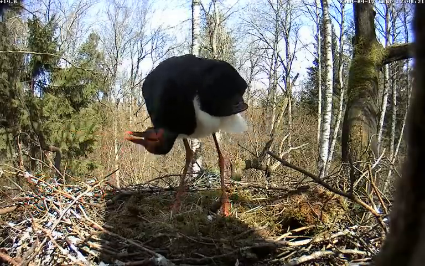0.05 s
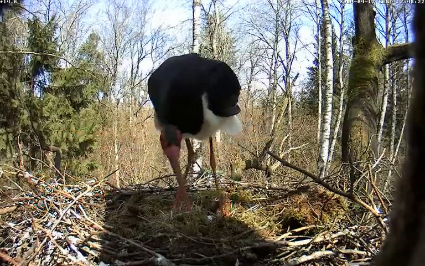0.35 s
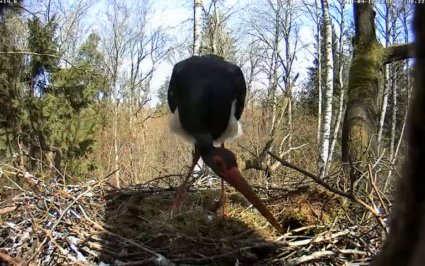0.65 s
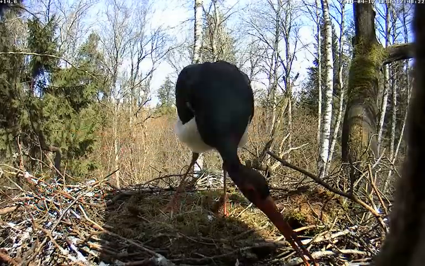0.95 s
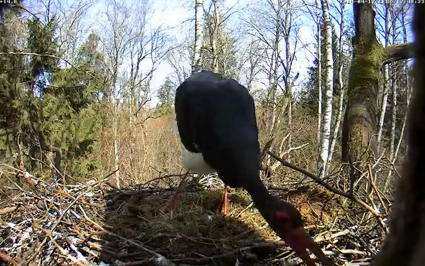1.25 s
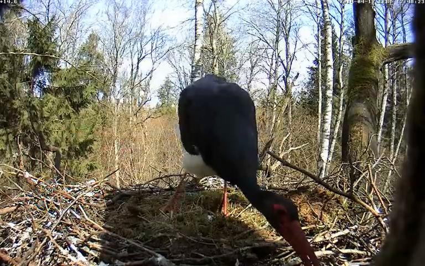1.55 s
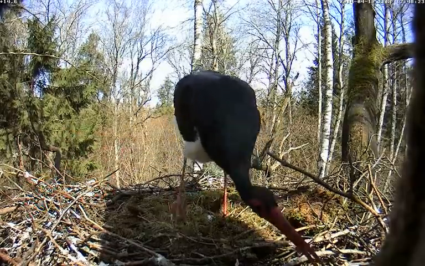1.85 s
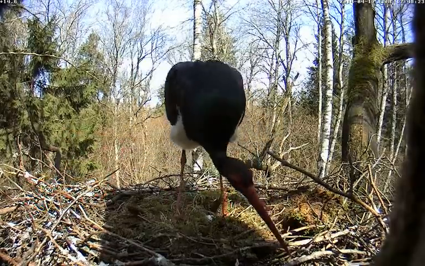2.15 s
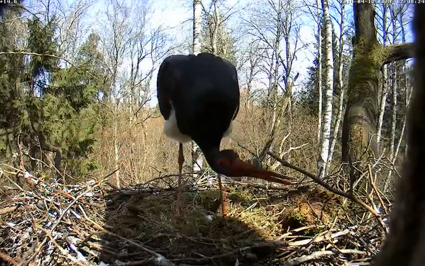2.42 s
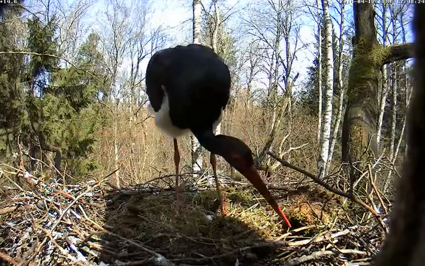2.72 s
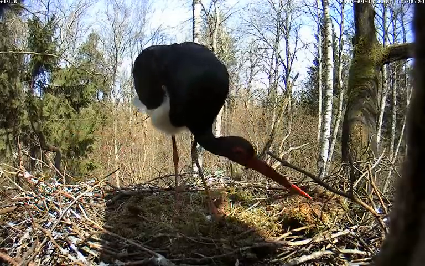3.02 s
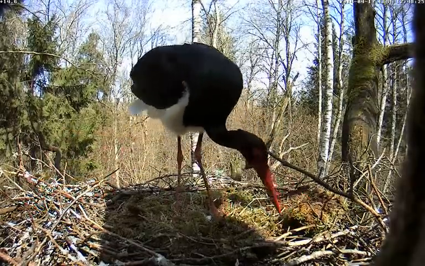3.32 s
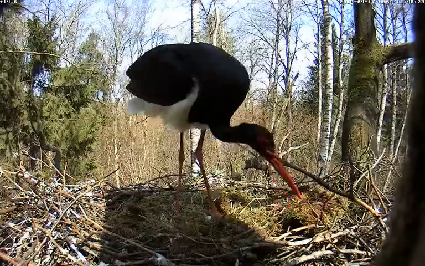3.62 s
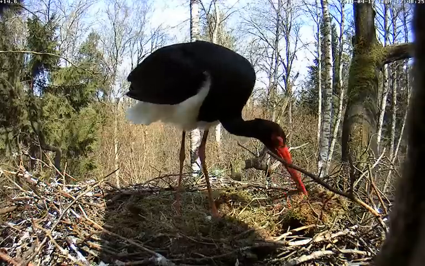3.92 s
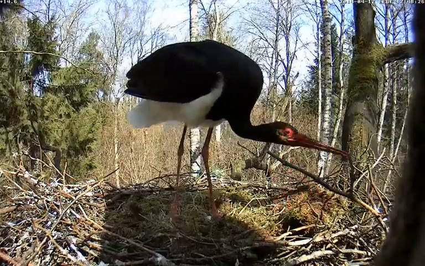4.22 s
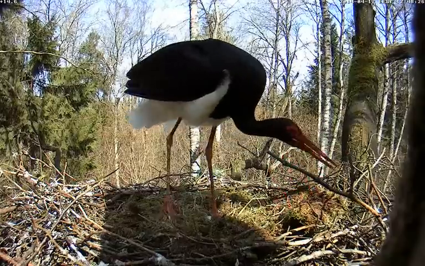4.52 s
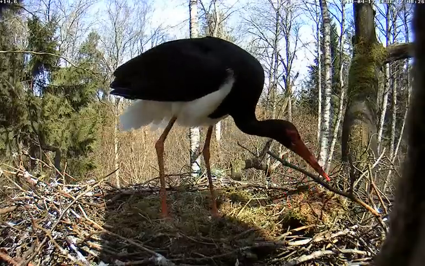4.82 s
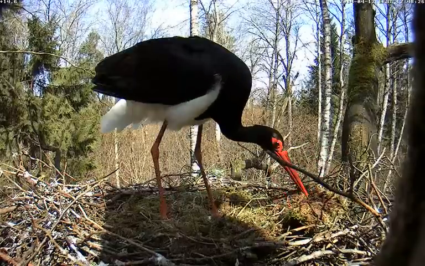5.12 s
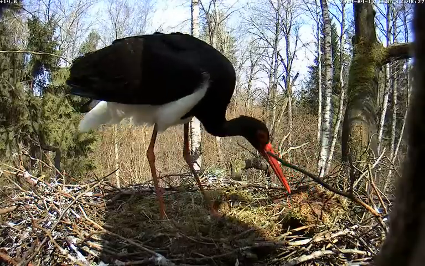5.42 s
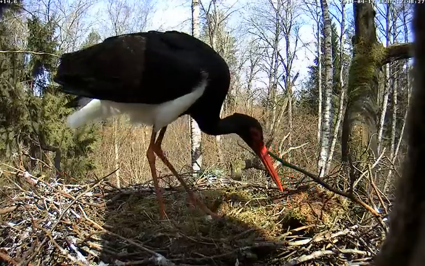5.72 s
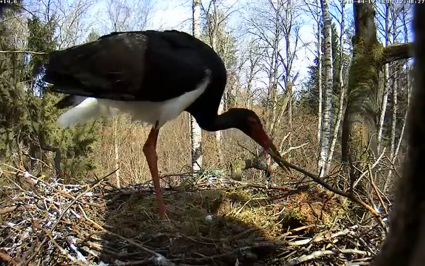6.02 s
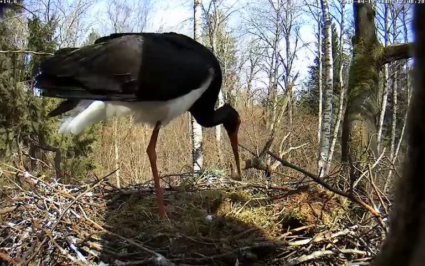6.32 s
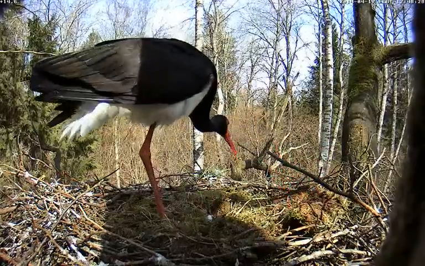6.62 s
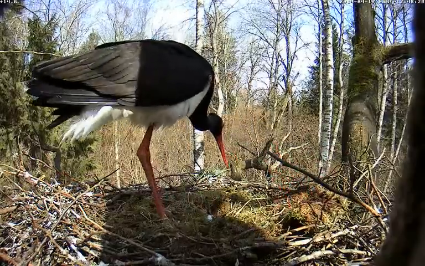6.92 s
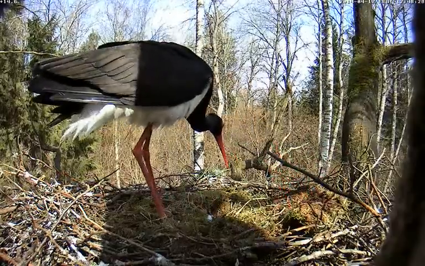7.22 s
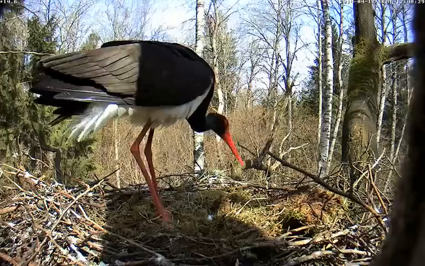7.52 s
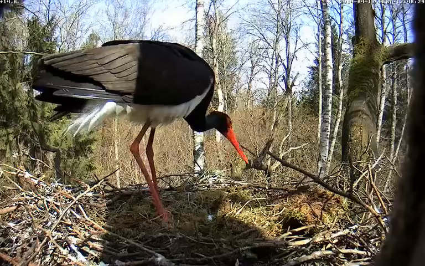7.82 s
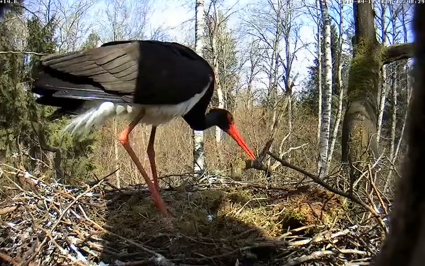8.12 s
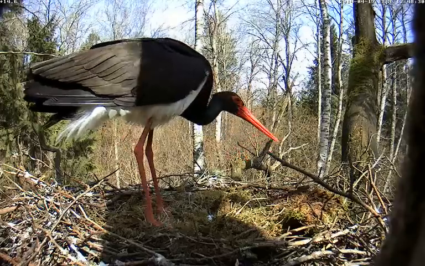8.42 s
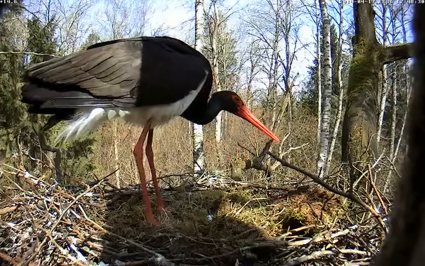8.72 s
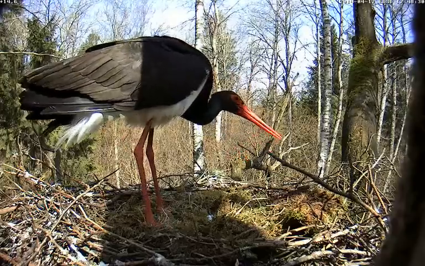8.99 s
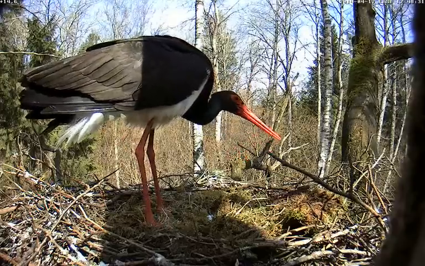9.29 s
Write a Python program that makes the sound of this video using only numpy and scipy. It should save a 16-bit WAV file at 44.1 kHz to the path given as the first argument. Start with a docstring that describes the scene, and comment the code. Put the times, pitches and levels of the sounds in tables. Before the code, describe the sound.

Loud arching whistles from a large bird repeat a little under twice a second, each led by a throaty rasp, overloading the close, hollow-sounding microphone. The bill clicks twice early on. The calling then drops to soft, breathy, irregular whistles and short pips, while feet thud quietly on the stick nest. A low wash of distant woodland air lies underneath.

```python
"""A nest in a wood: a black stork calls close to a small microphone.
Each call is a short hoarse rasp from the throat, then an arched, airy whistle that turns pure
when blown hard. Loud whistles overload the microphone; the later ones are weak and husky.
The bill snaps, feet thud on the sticks, distant air washes through the trees.
The microphone's hollow 1450 Hz resonance colours rasp, breath, snaps and distant air."""
import sys
import numpy as np
from scipy import signal
from scipy.fft import rfft, irfft
from scipy.io import wavfile

SR = 44100
rng = np.random.default_rng(int(sys.argv[2]) if len(sys.argv) > 2 else 0)


def log_audio(samples):
    """Write samples as a 16-bit WAV file to the path given in sys.argv[1]."""
    # one column per channel
    frames = np.atleast_2d(samples).T
    # limit to full scale, then quantise
    limited = np.clip(frames, -1, 1)
    pcm = np.round(limited * 32767).astype(np.int16)
    wavfile.write(sys.argv[1], SR, pcm)


N = 421145
TIME = np.arange(N) / SR

# breath heard through the microphone's 1450 Hz resonance: f/Hz, relative level/dB
BREATH_AT_MIC = [(600, -40.5), (950, -18.5), (1250, -2.5), (1450, 9.5), (1700, -4), (1950, -15.5),
                 (2500, -10.5), (3400, -16), (4000, -32.5), (4400, -39.5)]
# breaks of the overblown whistle: start/s, end/s, extra tone f/Hz, level/dB
CRACKS = [(1.365, 1.407, 1767, -14.5), (1.366, 1.409, 2869, -17.5), (3.668, 3.714, 1770, -4.5)]


def whistles(pure_db=-9, husk_span_db=4, waver=0.01042, drift=0.003, register_hz=1420):
    """Soft blowing only colours the turbulence; hard blowing locks it into a nearly pure tone."""
    # pitch multiple, relative level/dB
    overtones = [(2, -4), (3, -20)]
    # airway resonances gliding with the pitch: pitch multiple, relative level/dB
    side_modes = [(1.62, -6), (1.97, -4.5), (3, -19.5)]
    hz, tone_db, air_db, sounding = whistle_arches()
    hz, tone_db, air_db = overblow(hz, tone_db, air_db)
    tone_db = tone_db + 0.37 * flutter(22)
    air_db = air_db + 1.13 * flutter(25)
    husk = 0.0024 + 1 / (1.5 + np.exp((tone_db - pure_db) / husk_span_db + 2.5))
    wobble = waver * np.sqrt(husk) * (flutter(120) + flutter(24.6)) + drift * flutter(18)
    phase = 2 * np.pi * np.cumsum(hz * (1 + wobble)) / SR
    tone = undb(tone_db) * blown(phase, husk, width_hz=55)
    # overtones need pressure to start, level off once locked, fade in the high register
    onset_db, limit_db = -22, -11
    overtone_gain = undb(tone_db) / np.hypot(1, undb(onset_db - tone_db))
    overtone_gain /= np.hypot(1, undb(tone_db - limit_db))
    overtone_gain /= 1 + (hz / register_hz) ** 12
    for multiple, db in overtones:
        tone += overtone_gain * undb(db) * blown(multiple * phase, husk ** 0.25, width_hz=85)
    sides = sum(undb(db) * blown(multiple * phase, husk=0.77, width_hz=63) for multiple, db in side_modes)
    air = undb(air_db) * (undb(6) * noise(BREATH_AT_MIC) + np.sqrt(husk) * sides)
    return sounding * (tone + air)


def whistle_arches(rest_hz=893.3, idle_hz=820, full_hz=1362.8, fade_hz=1385.6,
                   drop_s=0.045, build_db=-18, build_s=0.013):
    """Pitch rises, holds and sinks; blowing effort follows it and drives tone and air."""
    # start/s, rise/s, hold/s, fall/s, start f/Hz, crest f/Hz, rise exponent, quick-drop share,
    # crest tone/dB, crest air drive/dB, rest air drive/dB
    arches = [(0.088, 0.13, .044, 0.22, 1115, 1315, .78, 0.21, 2.5, -14, -29.5),
              (0.668, 0.14, .036, .220, 1100, 1252, .75, 0.55, 0.5, -10, -30),
              (1.267, .121, .008, .208, 1330, 1672, .85, .68, 1.5, -16, -27.5),
              (1.818, 0.19, .048, 0.14, 997, 1172, .8, .4, -10, -19, -26),
              (2.388, .130, .035, 0.3, 1135, 1308, .68, 0.27, 1.5, -12.5, -26.5),
              (3.036, .080, .106, .158, 1125, 1328, .66, 0.11, .5, -14.5, -29),
              (3.572, 0.12, 0.005034, 0.33, 1272, 1512, 1.28, .45, 3, -16, -29),
              (4.237, .098, .037, .298, 1135, 1307, .95, .4, -5.5, -18.5, -31.5),
              (4.878, .167, .047, 0.21, 988, 1042, .77, .38, -26, -29, -31),
              (6.115, .140, .028, 0.13, 880, 1233, 2.0, .02, -24, -23.5, -34.5),
              (6.590, 0.17, .151, .155, 1053, 1156, 1.51, .15, -27.5, -29.5, -36.5),
              (7.290, 0.23, .041, 0.2, 920, 1219, 3.5, .03, -20.5, -28, -38.5),
              (7.964, 0.33, 0.092, 0.14, 892, 1200, 4.4, .4, -20, -27, -36.5)]
    hz = np.full(N, rest_hz)
    tone_db, air_db, sounding = np.zeros((3, N))
    for start, rise, hold, fall, start_hz, crest_hz, bend, drop, crest_db, rush_db, rest_db in arches:
        length_s = rise + hold + fall
        on = (TIME >= start) & (TIME < start + length_s)
        age_s = TIME[on] - start
        rising = age_s < rise
        fall_age_s = np.maximum(age_s - rise - hold, 0)
        quick_drop = 1 - drop + drop * np.exp(-fall_age_s / drop_s)
        rise_hz = start_hz + (crest_hz - start_hz) * (age_s / rise) ** bend
        fall_hz = rest_hz + (crest_hz - rest_hz) * (1 - fall_age_s / fall) * quick_drop
        hz[on] = np.where(rising, rise_hz, fall_hz)
        full_effort_hz = np.minimum(crest_hz, np.where(rising, full_hz, fade_hz))
        effort = np.clip((hz[on] - idle_hz) / (full_effort_hz - idle_hz), 0, 1)
        tone_drive = effort ** np.where(rising, 1.36, 1.87)
        tone_db[on] = np.interp(tone_drive, [0, 1], [rest_db - 3.5, crest_db])
        tone_db[on] += build_db * np.exp(-age_s / build_s)  # tone builds up behind the air
        air_db[on] = rest_db + (rush_db - rest_db) * effort ** 2.23
        sounding[on] = gate(age_s, length_s, attack_s=0.018, release_s=0.061)
    return hz, tone_db, air_db, sounding


def overblow(hz, tone_db, air_db, choke_db=-11, lock_db=-0.5, lock_hz=1362.8, lock_span_hz=80):
    """The tone flips register once, chokes at each crack and, when high, draws in the turbulence."""
    # upward register flip: start/s, end/s, first pitch ratio, last pitch ratio, boost/dB
    flip = (.786, .861, 1.24, 1.15, 2.5)
    start, end, first_ratio, last_ratio, boost_db = flip
    flipped = swell(start, end, edge_s=0.00497)
    cracked = np.max([swell(*crack[:2], edge_s=0.0056) for crack in CRACKS], axis=0)
    hz = hz * np.interp(TIME, [start, end], [first_ratio, last_ratio]) ** flipped
    locked = np.clip((hz - lock_hz) / lock_span_hz, 0, 1) * (1 - cracked)
    return hz, tone_db + boost_db * flipped + choke_db * cracked, air_db + lock_db * locked


def cracks():
    """The overblown whistle screeches: rough extra tones burst in above it."""
    return sum(swell(start, end, edge_s=0.01) * undb(db)
               * blown(2 * np.pi * hz * TIME, husk=0.824, width_hz=190)
               for start, end, hz, db in CRACKS)


def rasps(hiss_crest=0.57, hiss_start_db=-12, hiss_end_db=-24, shudder_db=0.86):
    """Air drawn through the narrowed throat: a steady rasp and a swelling hiss, shuddering together."""
    # start/s, length/s, rasp level/dB, hiss level/dB
    breaths = [(-0.100, 0.18, -15.5, -16.5), (0.473, 0.19, -18.5, -15), (1.069, 0.18, -14.5, -14.5),
               (1.621, 0.19, -16, -14.5), (2.198, 0.19, -18.5, -15), (2.855, 0.18, -17, -15),
               (3.383, 0.19, -19, -19.5), (4.05, 0.18, -20.5, -20.5), (4.682, 0.19, -20.5, -21),
               (5.754, 0.2, -20, -19.5), (6.391, 0.19, -22.5, -25), (7.095, 0.18, -24.5, -26.5),
               (7.764, 0.19, -24, -28), (8.601, 0.2, -23.5, -22.5), (9.53, .180, -25, -19.5)]
    # rasp heard through the microphone's hollow 1450 Hz resonance: f/Hz, relative level/dB
    rasp_at_mic = [(600, -55.5), (1000, -15.5), (1250, -8.5), (1460, 3.5), (1700, -2.5), (2000, -10.5),
                   (2600, -24)]
    # f/Hz, relative level/dB
    hiss_spectrum = [(1400, -12.5), (1950, -5.5), (2350, 2.5), (2850, 3.5), (3400, -1.5), (3900, -8),
                     (4400, -21)]
    rasp, hiss = np.zeros((2, N))
    for start, length_s, rasp_db, hiss_db in breaths:
        on = (TIME >= start) & (TIME < start + length_s)
        age_s = TIME[on] - start
        flow = gate(age_s, length_s, attack_s=0.018, release_s=0.038)
        past_crest = age_s / length_s - hiss_crest
        rise_db = hiss_start_db * (past_crest / hiss_crest) ** 2
        fall_db = hiss_end_db * (past_crest / (1 - hiss_crest)) ** 2
        rasp[on] += flow * undb(rasp_db)
        hiss[on] += flow * undb(hiss_db + np.where(past_crest < 0, rise_db, fall_db))
    breath = rasp * noise(rasp_at_mic) + hiss * noise(hiss_spectrum)
    return breath * undb(shudder_db * flutter(130))


def pips(air_db=-14, tail_s=0.035):
    """Short, weakly blown notes without overtones; a little air trails after each."""
    # start/s, end/s, start f/Hz, end f/Hz, level/dB, husk share
    notes = [(5.19, 5.321, 1464, 1339, -23, 0.66), (5.62, 5.731, 1390, 1470, -28, 0.6),
             (5.91, 5.96, 1390, 1384, -22.5, 0.18), (5.985, 6.049, 1383, 1340, -19.5, 0.2),
             (7.296, 7.412, 1365, 1407, -25.5, 0.85), (7.979, 8.162, 1393, 1390, -24.5, 0.58),
             (8.825, 8.88, 1400, 1473, -15, 0.3), (9.027, 9.112, 1405, 1383, -29.5, .4)]
    air = undb(air_db) * noise(BREATH_AT_MIC)
    out = np.zeros(N)
    for start, end, start_hz, end_hz, db, husk in notes:
        phase = 2 * np.pi * np.cumsum(np.interp(TIME, [start, end], [start_hz, end_hz])) / SR
        tone = swell(start, end, edge_s=0.017) * blown(phase, husk, width_hz=33)
        trail = (TIME > start) * np.exp(-np.maximum(TIME - end, 0) / tail_s)
        out += undb(db) * (tone + trail * air)
    return out


def head_bow(voice, dull_hz=3950, neck_hz=3300, neck_q=14, neck_db=-2):
    """Facing down into the nest dulls the voice; the bent neck adds a narrow resonance."""
    # t/s, bowed share
    posture = [(5.9, 0), (6.4, 0.99), (7.25, 0.93), (7.8, 0.3), (8.7, 0.01)]
    bowed = np.interp(TIME, *np.transpose(posture))
    dull = signal.sosfiltfilt(signal.butter(4, dull_hz, fs=SR, output="sos"), voice)
    neck = signal.lfilter(*signal.iirpeak(neck_hz, neck_q, fs=SR), voice)
    return (1 - bowed) * voice + bowed * (dull + undb(neck_db) * neck)


def bill_snaps():
    """The bill snaps shut; each click rings briefly in the microphone's 1450 Hz resonance."""
    # t/s, peak level/dB
    snaps = [(1.243, -6), (1.583, -7)]
    # f/Hz, t60/s, relative level/dB
    snap_ring = [(1110, .02, -10.5), (1454, 0.016, 34.5), (2550, .012, -12.5), (3430, 0.011, -13)]
    t = TIME[:SR // 10]
    ring = sum(undb(db - 60 * t / t60) * np.sin(2 * np.pi * hz * t) for hz, t60, db in snap_ring)
    impacts = np.zeros(N)
    for start, db in snaps:
        impacts[int(start * SR)] = undb(db)
    return signal.fftconvolve(impacts, ring / np.abs(ring).max())[:N]


def steps(rise_s=0.017):
    """The heavy stick nest carries steps and shifts of weight to the microphone as dull thuds."""
    # t/s, gain/dB, decay/s
    footfalls = [(1.502, -36.5, .9), (2.56, -29, 0.31), (2.66, -32, .12), (4.551, -14.5, 0.027),
                 (6.48, -22, 0.034), (6.66, -19.5, 0.055), (6.949, -17, 0.044), (7.029, -18.5, .08)]
    thud_spectrum = [(25, -10.5), (45, -3.5), (75, -11.5), (130, -18), (260, -33.5)]  # f/Hz, level/dB
    load = np.zeros(N)
    for start, db, decay_s in footfalls:
        age_s = np.maximum(TIME - start, 0)
        load += undb(db) * (1 - np.exp(-age_s / rise_s)) * np.exp(-age_s / decay_s)
    return load * noise(thud_spectrum)


def wood(level_db=-30, swell_db=1.1):
    """Distant air, swelling a little, heard through the microphone's 1450 Hz resonance."""
    # f/Hz, relative level/dB
    wash_at_mic = [(20, -7), (45, -9), (110, -7), (220, -11), (400, -11.5), (800, -11), (1150, -8),
                   (1440, 2.5), (1650, -9), (2000, -22), (2700, -30), (3600, -35.5), (4400, -47)]
    return undb(level_db + swell_db * flutter(4.1)) * noise(wash_at_mic)


def blown(phase, husk, width_hz, saturation_power=0.32):
    """Air-driven resonance: a steady tone mixed with a share (husk) of turbulent ringing."""
    ringing = unit(flutter(width_hz) + 1j * flutter(width_hz))
    motion = np.sqrt(1 - husk) + np.sqrt(husk) * ringing
    # the jet saturates: phase wanders more freely than strength
    motion = unit(motion * np.abs(motion) ** (saturation_power - 1))
    return np.sqrt(2) * np.real(motion * np.exp(1j * phase))


def noise(spectrum):
    """Unit-rms noise through (f/Hz, level/dB) points, falling steeply beyond the ends."""
    hz, db = np.transpose(spectrum)
    f = np.maximum(np.fft.rfftfreq(N, 1 / SR), 1)
    skirts = np.minimum(1, np.minimum(f / hz[0], hz[-1] / f)) ** 6
    shape = undb(np.interp(np.log(f), np.log(hz), db))
    return unit(irfft(rfft(rng.standard_normal(N)) * skirts * shape, N))


def flutter(hz):
    """Unit-rms random motion, low-passed at hz."""
    return unit(lowpass(rng.standard_normal(N), hz))


def gate(age_s, length_s, attack_s, release_s):
    """Gain with quadratic attack and linear release."""
    return np.clip(np.minimum((age_s / attack_s) ** 2, (length_s - age_s) / release_s), 0, 1)


def swell(start_s, end_s, edge_s):
    """Trapezoid gain."""
    return np.clip(np.minimum(TIME - start_s, end_s - TIME) / edge_s, 0, 1)


def lowpass(x, hz, order=2):
    """Butterworth low-pass."""
    return signal.sosfilt(signal.butter(order, hz, fs=SR, output="sos"), x)


def clip(x, ceiling, knee):
    """Flatten peaks at the ceiling; a higher knee is sharper."""
    return x / (1 + np.abs(x / ceiling) ** knee) ** (1 / knee)


def undb(db):
    """Decibels to gain."""
    return 10 ** (np.asarray(db) / 20)


def unit(x):
    """Scale to rms 1."""
    return x / np.sqrt(np.mean(np.abs(x) ** 2))


def scene():
    """The stork on its nest, the wood behind; mono."""
    voice = head_bow(whistles() + cracks() + pips() + rasps())
    return (voice + bill_snaps() + steps() + wood())[None]


def record(dry, band_hz=4200, clock_hz=11025, edge_hz=10000, top_hz=15750, bias=0.018, ripple=0.028):
    """A narrow-band microphone feeds two clipping stages, slightly lopsided, adding a bright edge."""
    mic = lowpass(dry, band_hz, order=14)
    # the converter clock ripples the ceiling: overloads carry mirror tones that fall as pitch rises
    ceiling = 0.7 * (1 + ripple * np.cos(2 * np.pi * clock_hz * TIME))
    x = clip(mic + bias, ceiling, knee=36) - bias
    x = signal.fftconvolve(x, signal.firwin(255, edge_hz, fs=SR)[None], mode="same")
    x = x - lowpass(x, hz=17, order=1)  # DC block
    x = clip(x, ceiling=0.69, knee=36)
    return signal.fftconvolve(x, signal.firwin(511, top_hz, window="blackman", fs=SR)[None], mode="same")


dry = scene()
out = record(dry)
log_audio(out)
```